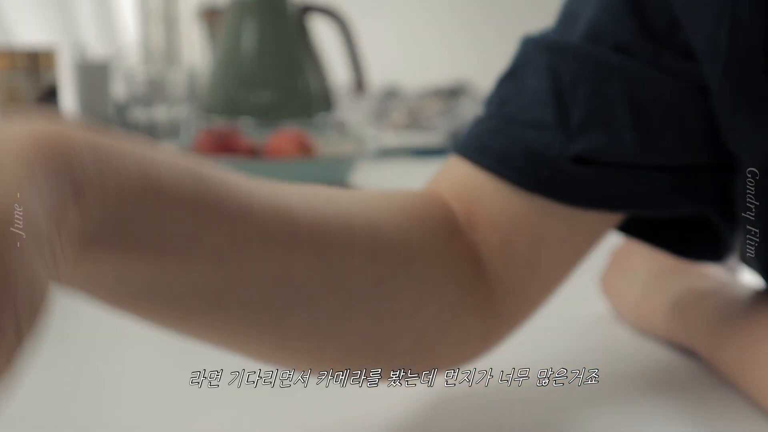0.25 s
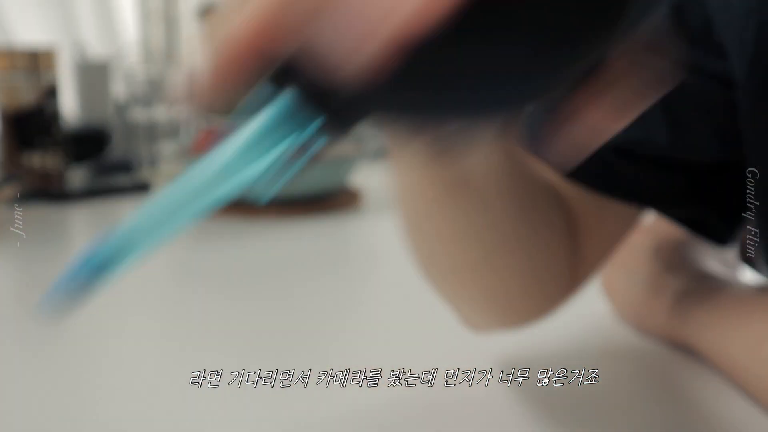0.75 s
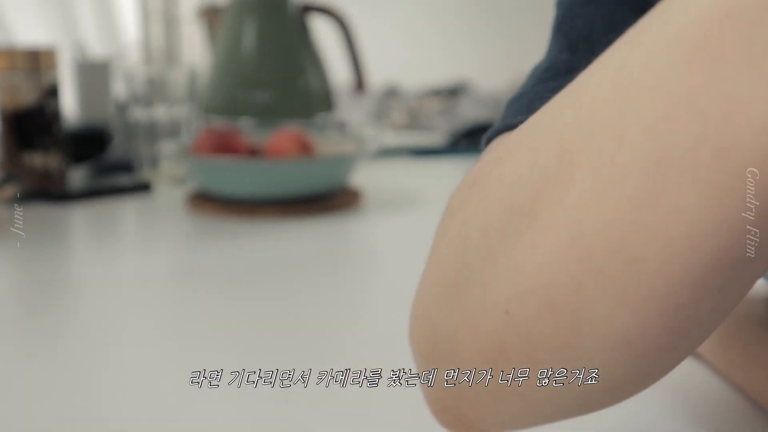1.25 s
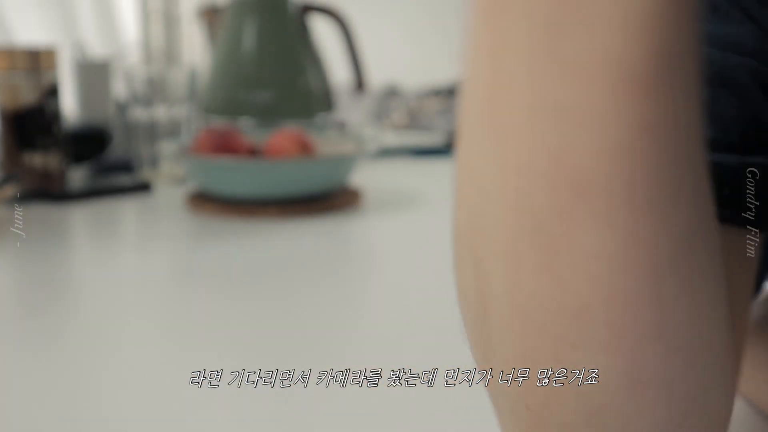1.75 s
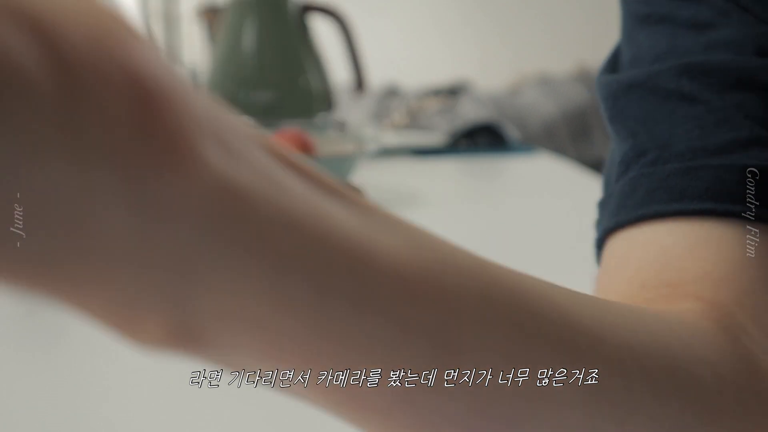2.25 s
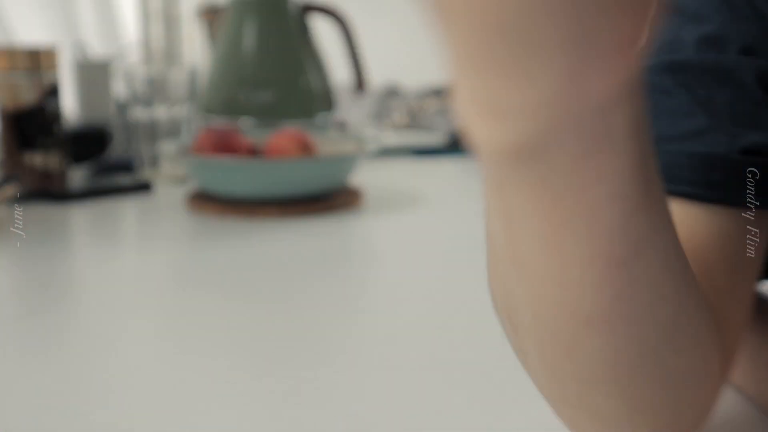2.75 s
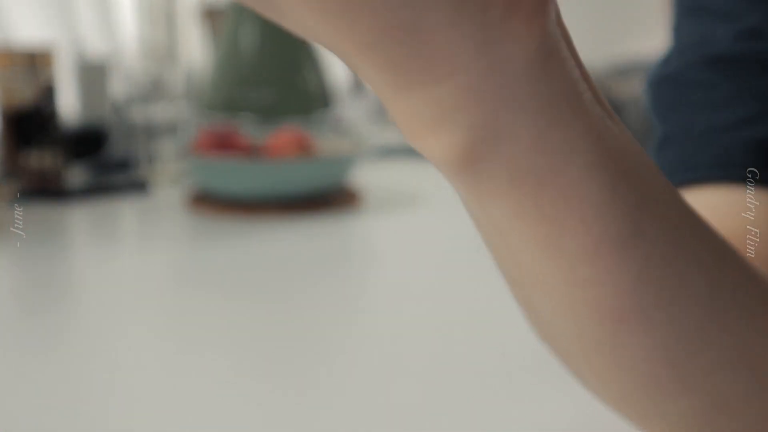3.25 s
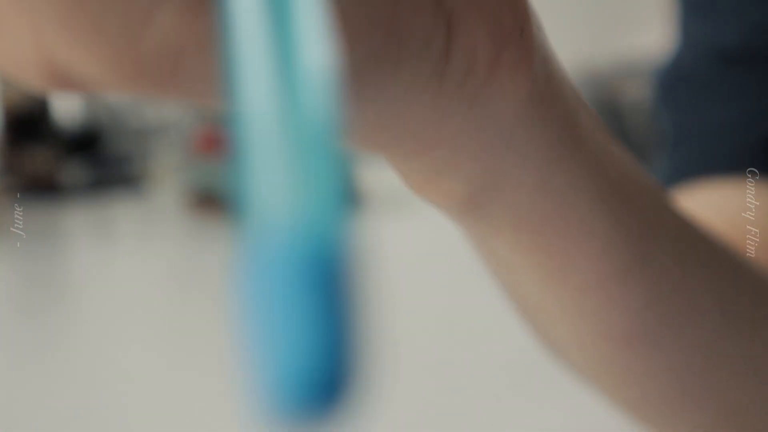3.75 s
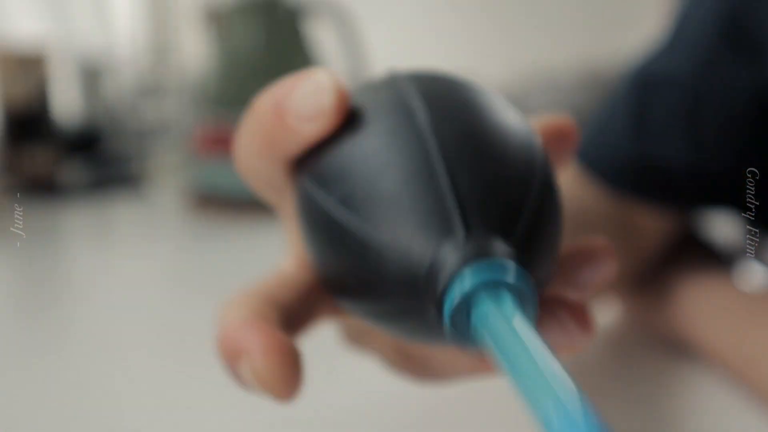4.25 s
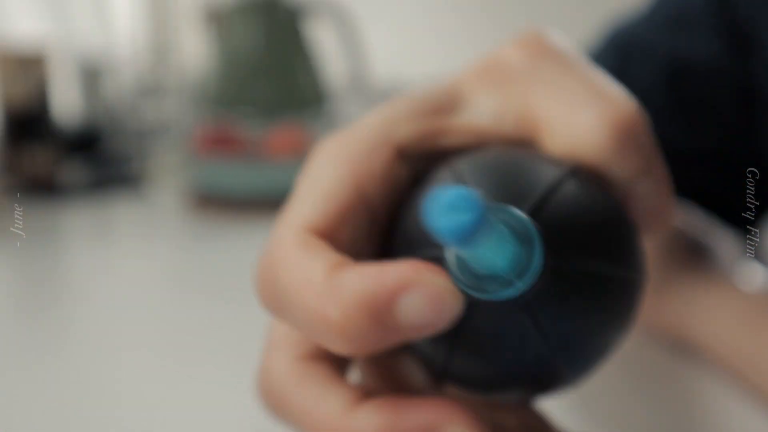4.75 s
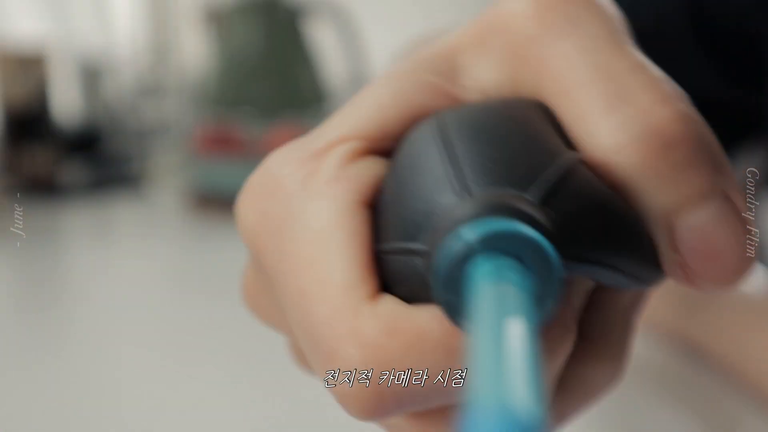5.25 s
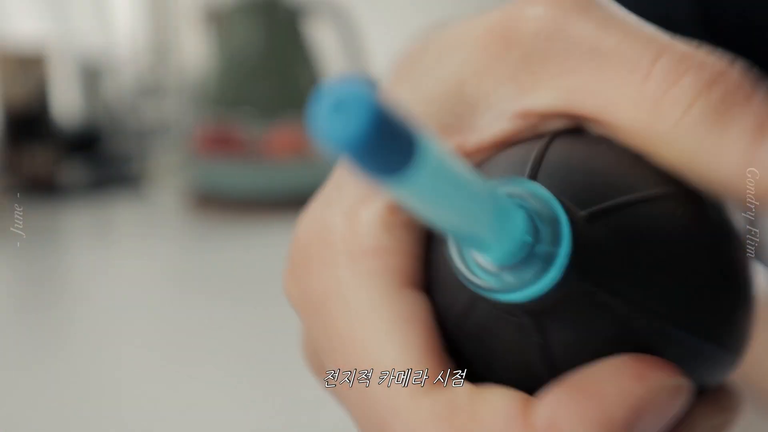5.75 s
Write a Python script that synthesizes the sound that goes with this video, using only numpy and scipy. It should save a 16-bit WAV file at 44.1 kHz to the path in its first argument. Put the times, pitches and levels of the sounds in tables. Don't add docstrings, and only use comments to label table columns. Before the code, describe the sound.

In a quiet kitchen with faint appliance hum, plastic ticks and skin rustles lead into seven squeezes of a rubber air blower. Each gives a short hissing jet, then a thin, very high whistling suck of air as the bulb refills. The second and third puffs hit the microphone with low, thudding wind buffets. After a pause with light handling and a loud dull knock, two fainter puffs follow. Very close stereo microphone.

```python
import sys
import numpy as np
from scipy import signal
from scipy.fft import irfft
from scipy.io import wavfile
from scipy.ndimage import uniform_filter1d

SR = 44100
rng = np.random.default_rng(int(sys.argv[2]) if len(sys.argv) > 2 else 0)


def field_ratio(decibels):
    return 10 ** (np.asarray(decibels, dtype=float) / 20)


def log_audio(samples):
    frames = np.atleast_2d(samples).T
    limited = np.clip(frames, -1, 1)
    pcm = np.round(limited * 32767).astype(np.int16)
    wavfile.write(sys.argv[1], SR, pcm)


N = 265482

# frequency in Hz, level in dB per Hz.
ROOM_AIR = [(15, -44.5), (25, -7.5), (177, -7.5), (244, -8), (400, -14), (1230, -17), (7820, -35.5),
            (14000, -40)]
# frequency in Hz, likeness from -1 to 1.
ROOM_SAME = [(60, 1), (290, .94), (700, 0.66), (1400, 0.82), (3100, 0.12), (4500, -0.66), (7000, -0.85),
             (15000, -0.48)]
# frequency in Hz, level in dB.
HUMS = [(86.1, -65.5), (156.1, -72), (242.2, -68.5), (279.9, -70.5), (748.3, -78), (1001, -72.5),
        (1303, -95.5)]
# frequency in Hz, share of the phase (0-1),
# level in dB per radian, likeness kept (0-1).
PORTS = [(2510, 0.035, 1.06, 0.96), (3300, 0.027, 3, 0.56), (4010, .8, 1, 0.2), (7870, 0.57, 3.5, 0.89),
         (10500, 0.75, 3, 0.38), (12460, 1, 0.5, 0.87)]

# start in seconds, rise in
# seconds, # fall in seconds, level in dB, extra fall above 3 kHz in dB per octave.
STROKES = [(0.201, 0.036, 0.096, -59, 10), (.312, 0.0044, 0.06, -51, 2), (.35, 0.0098, 0.14, -57.5, 7),
           (3.95, 0.019, 0.023, -51.5, 10.5), (4.04, 0.015, 0.067, -68, -2.5),
           (4.081, 0.11, 0.31, -63, 1.5), (4.45, 0.05, 0.1, -59, 3.5), (4.87, 0.031, 0.067, -65, -3),
           (4.561, 0.2, .25, -67, 0.5), (5.66, 0.032, 0.028, -65, -3), (4.97, 0.028, 0.1, -62.5, 1.5),
           (5.431, 0.015, 0.071, -63.5, -10.5), (5.52, 0.28, 0.12, -64.5, 1.8)]
# frequency in Hz, level in dB per Hz.
SKIN = [(500, -9.5), (1800, -1.5), (3000, -11), (5000, -14.5), (8000, -19), (11000, -19.5), (14000, -26)]
# time in seconds, peak in dB, ring in Hz, left over right in dB.
TICKS = [(0.2228, -46, 2900, 8), (.2345, -41, 1520, 7), (.238, -44, 2580, 5), (0.2525, -37, 1910, 4),
         (0.2855, -34, 884, 2), (.3125, -27.5, 3300, 9), (.3142, -33, 2270, 9), (.3285, -49, 5560, 13),
         (.329, -38, 2720, 8), (.3425, -33, 3500, 3), (.3555, -29, 2370, 7), (.373, -46, 1500, 9),
         (0.6363, -42.5, 1840, -2), (1.4615, -46.5, 6800, -9), (1.4684, -41.5, 1717, -14),
         (1.917, -50.5, 6800, -1.5), (2.352, -55, 7500, -4), (2.793, -51, 6000, -1),
         (3.2256, -48, 7100, -12), (3.619, -54, 7100, 0)]
# time in seconds, peak in dB, 60 dB decay in seconds,
# lowest frequency in Hz, highest frequency in Hz.
SNAPS = [
    (0.223, -58, 0.0034, 2000, 6000),
    (.2855, -52, .005, 1200, 5000),
    (0.3134, -37.5, 0.0051, 1400, 6950),
    (.329, -53, 0.0067, 4500, 11000),
    (.3415, -46, 0.0087, 4000, 12000),
    (0.3545, -52, 0.006, 2000, 8000),
    (.6363, -55, 0.0046, 1200, 5000),
    (5.4585, -48, .012, 6000, 12000),
]
# time in seconds, peak in dB, ring in Hz, 60 dB decay in seconds,
# sharpness in dB.
KNOCKS = [
    (0.357, -31, 525, 0.01, -10),
    (.655, -47.5, 415, 0.017, 2),
    (1.464, -42, 250, .02, -5.5),
    (2.352, -44, 260, 0.014, -8),
    (2.791, -41.5, 316, 0.011, -1.5),
    (3.619, -39.5, 343, 0.0076, -3),
    (4.009, -37.5, 232, 0.058, -2.5),
    (5.4602, -23, 231, 0.026, -1.5),
]

# start in seconds, rise in seconds, fall in seconds, thud level in dB,
# flutter brightness in dB.
GUSTS = [(1.125, 0.06, 0.037, -43.5, 7), (1.185, 0.028, 0.048, -39.5, -7), (1.488, 0.064, 0.035, -40.5, -3),
         (1.561, 0.022, 0.024, -27.5, -10), (1.58, 0.022, 0.075, -29, -13),
         (1.94, 0.00593, 0.022, -34.5, 13.5), (1.951, 0.01, 0.032, -30.5, 5),
         (1.993, 0.02, 0.021, -32, -0.5), (2.023, 0.014, 0.037, -30.5, -12.5),
         (2.093, 0.035, 0.053, -43.5, -12.5), (5.095, 0.036, .11, -49, -3), (5.88, 0.069, 0.029, -50.5, 0),
         (5.947, 0.055, 0.067, -37, -5), (1.594, 0.008, .045, -36.5, 4.5),
         (5.112, 0.011, 0.052, -51.5, 5.5)]
# left-right likeness (0-1), eddy size as a factor (over 1 is
# deeper), lag at the right port in ms.
GUST_CROSSINGS = [(0.89, 1.14, .1), (0.85, 0.99, 0.065), (0.4, 1.8, .6), (.3, 1.01, 1.2), (.6, 0.98, 1.4),
                  (0.21, 2.8, 0.62), (0.25, 1.15, 0.68), (.4, 1.3, .9), (.4, 0.87, 1.87), (0.44, 1.46, .3),
                  (0.9, 0.7, .05), (0.88, 1.3, 0.04), (0.88, 1.9, .05), (1, 1.6, 1.2), (1, 0.98, 0.095)]
# frequency in Hz, level in dB per Hz.
THUD = [(20, -14.5), (50, -6), (100, -0.5), (170, -1), (300, -5.5), (500, -16), (900, -48.5)]
# frequency in Hz, level in dB per Hz.
FLUTTER = [(50, -54), (200, 1.5), (400, -3), (700, -6.5), (1200, -12), (2200, -21), (3200, -32.5),
           (5000, -67.5)]
# time in seconds, #
# peak in dB, turn rate in Hz, size at the right port as a factor, lag there in ms.
SLAPS = [(1.578, -12, 228, .1, 1), (1.5832, -12, 258, 0.29, 1.4), (1.5965, -9, 300, 1.45, 1.28),
         (1.6015, -13, 605, 1.6, .5), (1.6028, -8.5, 480, 0.55, 1.56), (1.6064, -23, 320, 2.6, 1.6),
         (1.6096, -14, 350, 1.8, 1.2), (1.6164, -25, 352, 0.97, 1.4), (1.6206, -13, 290, 1.1, 1.25),
         (1.628, -16, 460, 1.7, 0.91), (1.9402, -8, 290, .9, .95), (1.9432, -13, 420, 1.3, -.6),
         (1.946, -16, 600, 1.9, 1.05), (1.9502, -9, 450, .65, .5), (1.954, -15, 350, .5, 1.1),
         (1.9572, -14, 500, 1.9, -1.04), (1.9613, -9.5, 206, 0.72, -0.036), (1.967, -18, 300, 1.4, 1.24),
         (2.0135, -25, 300, 1.1, 0.073), (2.0364, -15, 221, 0.79, 0.79), (5.4607, -24, 406, 1.26, .02)]

# start in seconds, climb in seconds,
# descent in seconds, top pitch in Hz, level in dB.
HIGH_WHISTLES = [
    (1.383, .012, 0.023, 12280, -45),
    (2.636, .006, 0.019, 12100, -55),
    (3.893, 0.043, .003, 12880, -50),
    (3.971, 0.023, 0.0027, 12940, -53),
]
# time in seconds, pitch in Hz, level in dB.
GLIDES = [
    [(1.304, 12300, -61), (1.31, 12341, -42), (1.318, 12600, -43), (1.33, 12960, -43), (1.344, 12401, -43),
     (1.354, 12100, -45), (1.362, 12070, -57.5)],
    [(1.733, 12600, -60), (1.757, 12830, -51), (1.769, 12443, -45.5), (1.795, 12100, -50),
     (1.835, 12300, -45.5), (1.845, 12200, -55), (1.869, 12400, -48), (1.876, 12403, -60)],
    [(2.196, 12600, -69), (2.21, 12600, -53.5), (2.24, 12262, -55), (2.254, 12152, -66), (2.27, 12200, -51),
     (2.282, 12336, -65), (2.296, 12253, -58), (2.308, 12074, -75)],
    [(2.697, 12203, -63), (2.729, 12292, -53), (2.747, 12132, -57), (2.753, 12168, -67)],
    [(3.09, 12280, -65), (3.098, 12344, -51), (3.11, 12555, -49), (3.13, 12352, -50), (3.134, 12229, -60),
     (3.146, 12035, -58)],
    [(3.484, 12100, -56), (3.49, 12413, -53), (3.518, 12800, -50), (3.526, 12839, -60), (3.532, 12867, -52),
     (3.546, 12572, -49), (3.556, 12310, -59)],
]
# start in seconds, length in seconds, first pitch in Hz, last pitch in Hz, level in
# dB.
VALVE_CHIRPS = [(1.299, 0.0093, 10700, 11100, -49), (1.371, 0.017, 10900, 11100, -46.5),
                (1.417, 0.01, 11100, 10300, -52), (1.29, .016, 11080, 13900, -74),
                (1.72, 0.0084, 10700, 11100, -52), (1.723, 0.0078, 11000, 12430, -66),
                (2.182, 0.013, 10500, 10800, -65.5), (1.87, .008, 12400, 10600, -60),
                (2.304, 0.013, 10900, 10300, -56.5), (2.624, 0.013, 10700, 11000, -53.5),
                (2.662, 0.04, 10950, 11130, -55), (2.749, 0.012, 11250, 11100, -54.5),
                (2.757, 0.011, 10700, 10500, -53), (3.084, 0.0095, 10900, 10900, -47.5),
                (3.144, 0.023, 11000, 10700, -55), (3.17, 0.013, 10500, 10250, -52.5),
                (3.471, 0.013, 10600, 11100, -56), (3.583, 0.0057, 11100, 10700, -72),
                (3.583, 0.0041, 10700, 10500, -61), (5.454, .012, 10760, 10700, -56.5),
                (5.38, .085, 14650, 14700, -71), (1.352, 0.02, 12000, 12300, -56),
                (3.883, 0.012, 10700, 11000, -60), (5.369, 0.013, 10800, 12340, -61),
                (5.379, 0.019, 12400, 12900, -55.5), (5.392, 0.01, 12900, 13700, -60.5)]
# time in seconds, lead of the left port in radians.
WHISTLE_LEAD = [(1.3, -2.1), (1.8, -1), (2.25, 2), (2.7, 1.34), (3.1, 0.7), (3.5, 1.5), (3.9, 0.9),
                (5.4, 1.2)]

# start in seconds, length in seconds, intake hiss in dB,
# lower valve mode at first in Hz, and at last in Hz.
RELEASES = [
    (1.269, 0.17, -64.5, 10700, 11200),
    (1.676, .22, -64, 10650, 10750),
    (2.149, 0.19, -68, 11100, 10700),
    (2.593, .19, -66, 11000, 11200),
    (3.043, 0.17, -65, 11200, 10330),
    (3.448, .165, -61.5, 11000, 10700),
    (3.852, 0.19, -65, 11100, 10400),
    (5.351, 0.13, -63, 10800, 10630),
]
SONG_DB = [20, 20.5, 19, 12, 9, 6.8, 15, 20]
# frequency in Hz, level in dB per Hz.
INTAKE = [(800, -18), (2100, 5.5), (3600, -4.5), (6500, -7.5), (9300, -6), (11500, -0.5), (12900, -11.5),
          (15500, -27)]
# frequency in Hz, width in Hz, level in dB.
TUBE = [(5180, 780, -5), (7750, 540, -1), (10700, 820, -9)]
# frequency in Hz, width in Hz, level in dB.
UPPER_MODE = (12350, 500, -4)

# start in seconds, build-up in seconds, let-down in seconds, peak hiss in dB,
# hiss as the nozzle opens and shuts in dB.
SQUEEZES = [
    (0.962, 0.22, 0.062, -40.5, -55.5),
    (1.458, 0.12, 0.082, -29.5, -55.5),
    (1.966, .09, 0.085, -35.5, -59.5),
    (2.35, 0.096, 0.12, -48.5, -58),
    (2.787, 0.16, 0.082, -44, -55),
    (3.222, .12, 0.074, -47.5, -56.5),
    (3.616, .125, .1, -46, -55),
    (5.075, 0.08, 0.16, -50, -59),
    (5.844, 0.2, 0.049, -46.5, -62.5),
    (1.912, 0.016, 0.081, -48.5, -68),
]
# bearing in radians the left leads, left-right likeness (0-1),
# rush trim in dB, edge spray in dB.
AIM = [(-1.6, 0.5, -4, -12), (-3, 0.83, -6.5, 1.5), (1.14, 0.9, -7.5, 4.5), (0, 0.03, 6, -1),
       (-1, 0.3, -4, -9.5), (-0.5, 0.6, 4.5, -5.5), (-0.4, 0.58, 7, -2), (-0.7, 0.3, -0.5, -8.5),
       (-0.5, 1, -5.5, -6.5), (-0.5, 0.97, -7.5, -30.5)]
# delay after the start in seconds, half width in
# seconds, hiss gain in dB, roar gain in dB, rush gain in dB.
STRIKES = [(0.2243, 0.023, 1.5, 9.5, 24), (0.052, 0.056, 0, 7, 11.5), (0.051, 0.17, 2.5, 9, -0.5),
           (0.068, 0.038, 0.5, 12, 9), (0.143, 0.046, -.6, -2.5, -1), (0.12, 0.085, 4, 9.5, 11.5),
           (0.1, 0.048, 5, 11.5, 5.5), (0.098, 0.057, 0.7, 5, 17.5), (0.24, 0.096, 6.5, 0, 21),
           (.01, .02, 4.5, -5.5, 9.5)]
# roar pitch as a factor, pinch-off in seconds.
NOZZLE = [(1.01, 0.013), (0.98, .04), (1.05, .035), (1.05, .035), (1.07, 0.014), (0.99, .035), (1.014, .02),
          (1.01, .03), (1.09, .035), (0.98, 0.084)]
# frequency in Hz, level in dB per Hz.
HISS = [(2500, -32), (3800, -20), (5800, -26), (7800, -11.5), (9300, -1.5), (10600, 5), (11800, -2.5),
        (13000, -1), (15500, -5)]
# frequency in Hz, level in dB per Hz.
SPRAY = [(2500, -10), (4000, -2), (5500, -5.5), (7500, -2), (9200, 1.5), (11000, -8), (14000, -34)]
# frequency in Hz, level in dB per Hz.
ROAR = [(700, -16), (1450, -6), (2150, -0.5), (2700, -4.5), (3600, -15.5), (5000, -17), (8000, -38)]
# frequency in Hz, level in dB per Hz.
RUSH = [(200, -37), (420, -6.5), (600, -2.5), (850, 2), (1200, -3), (1800, -17.5), (3000, -51)]

# frequency in Hz, level in dB.
QUIET = [(7900, -135), (8500, -104), (11000, -103), (12600, -101), (13200, -100.5)]
# time in seconds, allowance in dB.
ALLOWANCE = [(0, 8.5), (.9, 10), (1.3, -1), (4.1, 3.5)]
# start in seconds, end in seconds.
TOP_OPEN = [(.3, .31), (.33, .34), (.95, 1.0), (1.205, 1.245), (1.462, 1.49), (1.62, 1.655), (1.735, 1.745),
            (1.91, 1.93), (2.0, 2.03), (2.35, 2.39), (2.795, 2.81), (2.83, 2.865), (3.225, 3.26),
            (3.62, 3.65), (3.99, 4.06), (5.385, 5.485)]


def read(points, hz):
    f, *columns = np.transpose(points)
    return [np.interp(np.log(hz + 1), np.log(f), c) for c in columns]


def add(mix, s, sound):
    part = mix[:, round(s * SR):][:, :sound.shape[1]]
    part += sound[:, :part.shape[1]]


def follow(rows):
    s, *columns = np.transpose(rows)
    t = np.arange(s[0], s[-1], 1 / SR)
    ends = np.minimum(np.minimum(t - s[0], s[-1] - t) / 0.002, 1)
    return s[0], ends, [np.interp(t, s, c) for c in columns]


def ridge(s, rise, fall, bend):
    u = np.linspace(0, 1, num=12)
    rise, fall = max(rise, 0.002), max(fall, 0.002)
    times = np.r_[s + rise * (u - 1e-3), s + rise + fall * u]
    return times, np.r_[(1 - u) ** bend, 0 * u], np.r_[0 * u, u ** bend]


def lumps(size, hz, db):
    x = signal.lfilter(*signal.butter(2, hz, fs=SR), rng.standard_normal(size + 2000))[2000:]
    g = field_ratio(db * np.clip(x / x.std(), -2, 1.5))
    return g / np.sqrt(np.mean(g ** 2))


def patchy(x, db):
    z = signal.stft(x, nperseg=256)[2]
    field = uniform_filter1d(rng.standard_normal(z.shape[1:]), size=4, axis=0)
    field = uniform_filter1d(field, size=10, axis=1)
    return signal.istft(z * field_ratio(db * field / field.std()), nperseg=256)[1][:, :x.shape[1]]


def air(size, spectrum, same, lead=0., modes=()):
    hz = np.fft.rfftfreq(size, 1 / SR)
    a, b, c, d = rng.standard_normal((len(hz), 4)).T
    phase, db_per_rad, _ = read(PORTS, hz)
    same = np.clip(same(hz) if callable(same) else same, -1, 1)
    left = a + 1j * b
    right = same * left + np.sqrt(1 - same ** 2) * (c + 1j * d)
    right = right * np.exp(-1j * lead * phase)
    colour = field_ratio(read(spectrum, hz)[0])
    for mode_hz, width, db in modes:
        colour = np.hypot(colour, field_ratio(db) / (1 + (2 * (hz - mode_hz) / width) ** 2))
    tilt = field_ratio(lead * db_per_rad / 2)
    pair = irfft(np.array([left * tilt, right / tilt]) * colour, size)
    return pair / pair.mean(0).std()


def near(same):
    def likeness(hz):
        phase, _, kept = read(PORTS, hz)
        return 1 - phase.clip(0, 1) * (1 - same * kept)
    return likeness


def room():
    t = np.arange(N) / SR
    bed = field_ratio(-58.5) * air(N, ROOM_AIR, lambda hz: read(ROOM_SAME, hz)[0]) * lumps(N, hz=8.8, db=-1.0)
    for hz, db in HUMS:
        hum = np.sqrt(2) * np.sin(2 * np.pi * (hz * t + rng.random()))
        bed += field_ratio(db) * lumps(N, hz=4.1, db=6.0) * hum
    return bed


def rustle(s, rise, fall, db, dull_db):
    t, before, after = ridge(s, rise, fall, 0.67)
    s, ends, (level_db,) = follow(np.transpose([t, db - 6.5 * before - 9 * after]))
    colour = [(hz, level - dull_db * max(np.log2(hz / 3000), 0)) for hz, level in SKIN]
    hiss = air(len(ends), colour, near(0.2), -0.68)
    return s, field_ratio(level_db) * ends * hiss * lumps(len(ends), hz=250, db=2.5)


def tick(s, db, hz, pan_db):
    t = np.arange(900) / SR
    crack = 0.094 * rng.standard_normal((2, 900)) + 0.17 * rng.standard_normal(900)
    band = signal.butter(2, [0.6 * hz, 1.6 * hz], "bandpass", fs=SR)
    crack = signal.lfilter(*band, crack * field_ratio(-60 * t / 0.014))
    ring = np.sin(2 * np.pi * hz * t) * field_ratio(-60 * t / 0.008)
    sound = (0.63 * ring + 2.2 * crack) * np.minimum(t / 0.0004, 1)
    return s, field_ratio(db) * sound * field_ratio([[pan_db / 2], [-pan_db / 2]])


def snap(s, db, t60, low_hz, high_hz):
    t = np.arange(600) / SR
    crack = 0.5 * rng.standard_normal((2, 600)) + rng.standard_normal(600)
    band = signal.butter(2, [low_hz, high_hz], "bandpass", fs=SR)
    crack = signal.lfilter(*band, crack * field_ratio(-60 * t / max(t60, 0.002)))
    return s, field_ratio(db) * crack * field_ratio([[2.5], [-2.5]])


def knock(s, db, hz, t60, sharp_db):
    t, sharp = np.arange(5000) / SR, field_ratio(sharp_db)
    bent_t = t + 0.00088 * sharp * (1 - np.exp(-t / 0.001))
    push = np.sin(2 * np.pi * hz * bent_t) * field_ratio(-60 * t / t60)
    push += 0.82 * sharp * np.sin(2 * np.pi * 2.8 * hz * t) * field_ratio(-60 * t / 0.0097)
    push += 0.48 * sharp * np.sin(2 * np.pi * 4.46 * hz * t) * field_ratio(-60 * t / 0.011)
    flesh = signal.butter(4, 10.4 * hz * min(sharp, 1.5), fs=SR, output="sos")
    push = signal.sosfilt(flesh, push)
    tail = air(len(t), FLUTTER, 0.99) * field_ratio(-22.5 - 60 * t / 0.36) * sharp
    return s, field_ratio(db) * (1.04 * push + tail * np.minimum(t / 0.0037, 1))


def eddy(s, rise, fall, db, bright_db):
    t, before, after = ridge(s, rise, fall, 2.1)
    return np.transpose([t, db - 12 * before - 24 * after, bright_db - 14.5 * after])


def gust(rows, same, girth, lag_ms):
    s, ends, (thud_db, bright_db) = follow(rows)
    n = len(ends)
    crests = lumps(n, hz=70, db=1.5)
    body = [(hz / girth, db) for hz, db in THUD]
    thuds = air(n, body, lambda hz: same + (1 - same) / (1 + (hz / 170) ** 4))
    left, right = thuds + field_ratio(bright_db) * crests * air(n, FLUTTER, same)
    at = np.arange(n)
    wind = np.array([left, np.interp(at - lag_ms * SR / 1000, at, right, period=n)])
    return s, field_ratio(thud_db) * ends * wind * lumps(n, hz=44, db=0.8)


def slap(s, db, hz, right, lag_ms):
    u = np.arange(-2, 3, hz / SR) - np.array([[0], [lag_ms * hz / 1000]])
    bump = np.cos(2 * np.pi * u) * np.exp(-(u - 0.18) ** 2 / 0.17)
    return s - 2 / hz, field_ratio(db) * 0.91 * bump * np.array([[1], [right]])


def arch(s, climb, descent, top_hz, db):
    rest_hz = 12220
    t, before, after = ridge(s, climb, descent, 1.2)
    back = min(descent / 0.02, 1)
    hz = top_hz + (rest_hz - top_hz) * (before + back * after)
    return np.transpose([t, hz, db - 3 * before - 6 * after ** 2])


def whistle(rows):
    s, ends, (hz, db) = follow(rows)
    n = len(hz)
    turn = 2 * np.pi * np.cumsum(hz + 60 * np.log(lumps(n, hz=90, db=3.5))) / SR
    at = np.arange(n)
    ends = ends * np.minimum(np.minimum(at, at[::-1]) / (0.004 * SR), 1) ** 0.7
    lead = np.interp(s, *np.transpose(WHISTLE_LEAD))
    pair = np.cos(turn + np.array([[lead], [0]])) / np.cos(lead / 2)
    return s, np.sqrt(2) * field_ratio(db) * ends * pair * lumps(n, hz=70, db=1.8)


def flow_in(s, length, db, first_hz, last_hz):
    build_s, full_s = 0.058, 0.015
    t = s + np.array([0, build_s, length - full_s, length])
    level_db = db + np.array([-9.5, 0, 0, -12.5])
    return np.transpose([t, level_db, first_hz + (last_hz - first_hz) * (t - s) / length])


def release(rows, song_db, lead, same, *_):
    s, ends, (hiss_db, mode_hz) = follow(rows)
    n = len(ends)
    hiss = air(n, INTAKE, near(same), lead, list(TUBE) + [UPPER_MODE])
    wandering_hz = mode_hz + 280 * np.log(lumps(n, hz=25, db=3.5))
    turn = np.exp(2j * np.pi * np.cumsum(wandering_hz) / SR)
    r = np.exp(-np.pi * 260 / SR)
    song = (turn * signal.lfilter([1 - r], [1, -r], hiss / turn)).real
    song_gain = field_ratio(song_db + 1.5 * (hiss_db - hiss_db.max()))
    sound = hiss + song_gain * song * lumps(n, hz=120.7, db=2.5)
    return s, field_ratio(hiss_db + 2.5) * ends * sound * lumps(n, hz=24.9, db=1.0)


def flow_out(row, strike, shut_s):
    s, rise, fall, peak_db, edge_db = row
    delay, width, lift_db, roar_db, rush_db = strike
    open_s, shut_db = 0.009, -22
    t, before, after = ridge(s + open_s, rise - open_s, fall, 1.8)
    t = np.r_[s - open_s / 2, t, t[-1] + max(shut_s, 0.004)]
    swell_db = peak_db + (edge_db - peak_db) * (before + after)
    hiss_db = np.r_[edge_db + shut_db, swell_db, edge_db + shut_db]
    on_lens = np.exp(-abs((t - s - delay) / width) ** 5.8)
    return np.transpose([t, hiss_db + lift_db * on_lens, -6.5 + roar_db * on_lens, -14 + rush_db * on_lens])


def squeeze(rows, pitch, lead, same, trim_db, spray_db):
    s, ends, (hiss_db, roar_db, rush_db) = follow(rows)
    n = len(ends)
    below_db = hiss_db - hiss_db.max()
    roar = [(hz * pitch, db) for hz, db in ROAR]
    fast_roar = [(hz * pitch * 1.3, db) for hz, db in ROAR]
    jet = air(n, HISS, near(same), lead, [(hz, width, db - 5) for hz, width, db in TUBE])
    jet += field_ratio(roar_db) * air(n, roar, near(same), lead)
    jet += field_ratio(roar_db - 8.5 + 0.6 * below_db) * air(n, fast_roar, near(same), lead)
    jet += field_ratio(spray_db + 0.38 * below_db) * air(n, SPRAY, near(same), lead)
    jet += field_ratio(rush_db + trim_db) * air(n, RUSH, 0.98) * lumps(n, hz=90, db=2.0)
    at = np.arange(n)
    lag = SR * (0.000488 + 0.00058 * np.sin(at / SR * 9 + 2 * np.pi * rng.random()))
    jet += 0.19 * np.array([np.interp(at - lag, at, port) for port in jet])
    return s, patchy(jet, db=1.57) * field_ratio(hiss_db) * ends * lumps(n, hz=160, db=0.5)


def echo_of(blower):
    t = np.arange(9000) / SR
    walls = rng.standard_normal((2, len(t))) * field_ratio(-60 * t / 0.39) * (t > 0.003)
    walls /= np.linalg.norm(walls[0])
    echo = signal.fftconvolve(blower.mean(0)[None], walls, axes=1)[:, :N]
    return field_ratio(-20.0) * signal.lfilter(*signal.butter(1, 5000, fs=SR), echo)


def scene():
    blower, rest = np.zeros((2, N)), room()
    for row in STROKES:
        add(rest, *rustle(*row))
    for row in TICKS:
        add(blower, *tick(*row))
    for row in SNAPS:
        add(blower, *snap(*row))
    for row in KNOCKS:
        add(rest, *knock(*row))
    for row, crossing in zip(GUSTS, GUST_CROSSINGS):
        add(rest, *gust(eddy(*row), *crossing))
    for row in SLAPS:
        add(rest, *slap(*row))
    for row in HIGH_WHISTLES:
        add(blower, *whistle(arch(*row)))
    for rows in GLIDES:
        add(blower, *whistle(rows))
    for s, length, first_hz, last_hz, db in VALVE_CHIRPS:
        add(blower, *whistle([(s, first_hz, db), (s + length, last_hz, db)]))
    for row, song_db, aim in zip(RELEASES, SONG_DB, AIM):
        add(blower, *release(flow_in(*row), song_db, *aim))
    for row, strike, aim, (pitch, shut_s) in zip(SQUEEZES, STRIKES, AIM, NOZZLE):
        add(blower, *squeeze(flow_out(row, strike, shut_s), pitch, *aim))
    return blower + echo_of(blower) + rest


def top_cut(x):
    return signal.sosfilt(signal.butter(12, 15690, fs=SR, output="sos"), x)


def record(dry):
    lead_in = 440
    pair = np.array([dry[0] + dry[1], dry[0] - dry[1]]) / 2
    pair = np.pad(pair, ((0, 0), (lead_in, 0)))
    shape = dict(fs=SR, window="cosine", nperseg=2048, noverlap=1024)
    hz, t, z = signal.stft(pair, **shape)
    power = np.add.reduceat(abs(z) ** 2, np.arange(0, len(hz), 20), axis=1) / 20
    mid_db, side_db = 10 * np.log10(power[:, np.arange(len(hz)) // 20] + 1e-20)
    column_hz = hz[:, None]
    spare_db = np.interp(t, *np.transpose(ALLOWANCE))
    quiet_db = read(QUIET, hz)[0][:, None] - spare_db
    keep_mid = (mid_db > quiet_db) & ((mid_db > side_db - 11 - spare_db) | (column_hz < 3500))
    keep_side = (side_db > quiet_db - 9) & (side_db > mid_db - 17)
    keep = np.array([keep_mid, keep_side])
    keep[:, hz < 700] = True
    treble_db = mid_db[(hz > 9000) & (hz < 13000)].mean(0)
    wander = uniform_filter1d(rng.standard_normal(len(t)), size=2)
    keep &= column_hz < 13260 - 14 * (treble_db + 83.0) + 150 * wander
    is_open = np.any([(t > a + 0.015) & (t < b + 0.015) for a, b in TOP_OPEN], axis=0)
    keep |= is_open & (abs(column_hz - 14300) < 1390)
    mid, side = signal.istft(z * keep, **shape)[1][:, lead_in:lead_in + N]
    return top_cut(np.array([mid + side, mid - side]))


dry = scene()
out = record(dry)
log_audio(out)
```